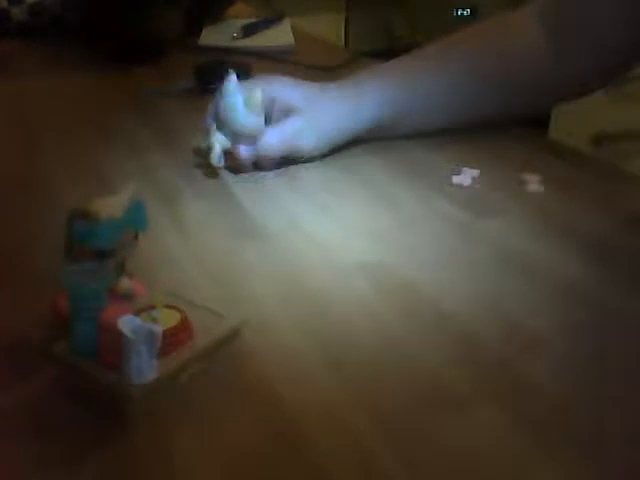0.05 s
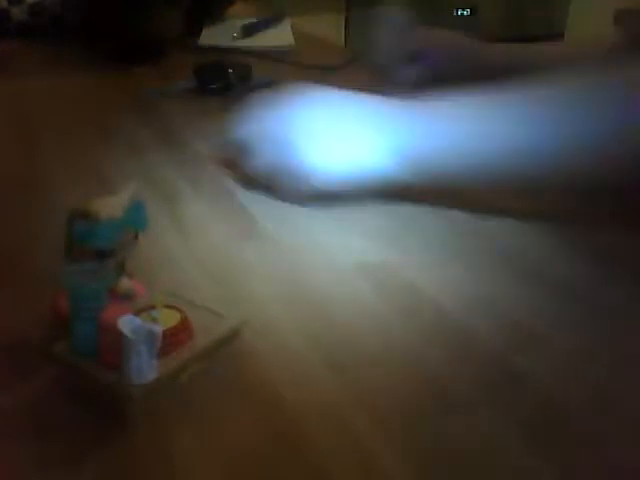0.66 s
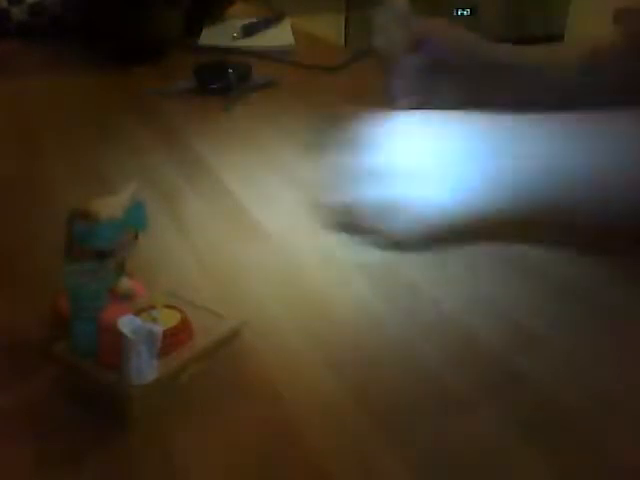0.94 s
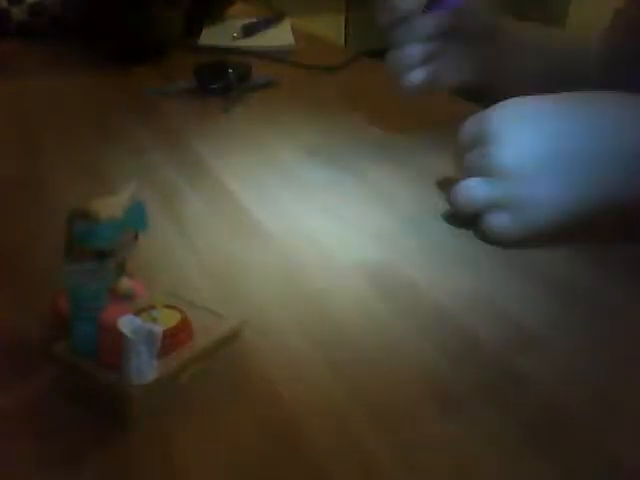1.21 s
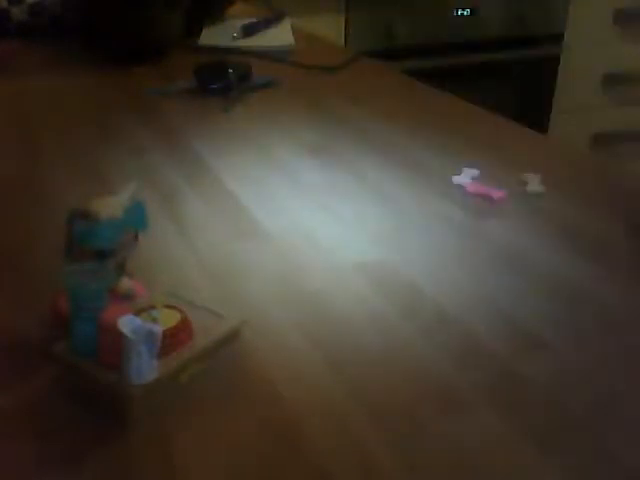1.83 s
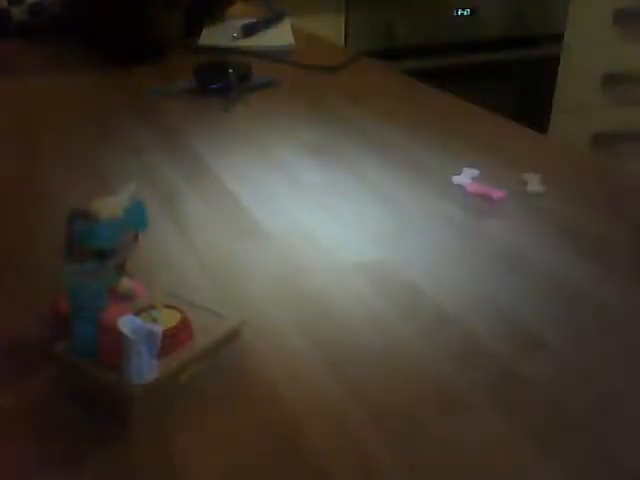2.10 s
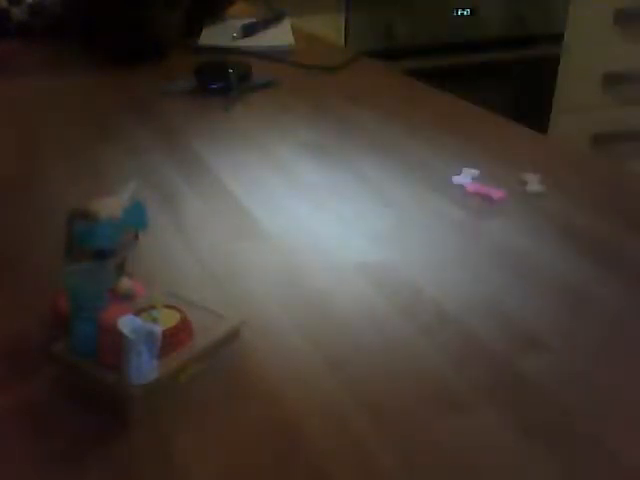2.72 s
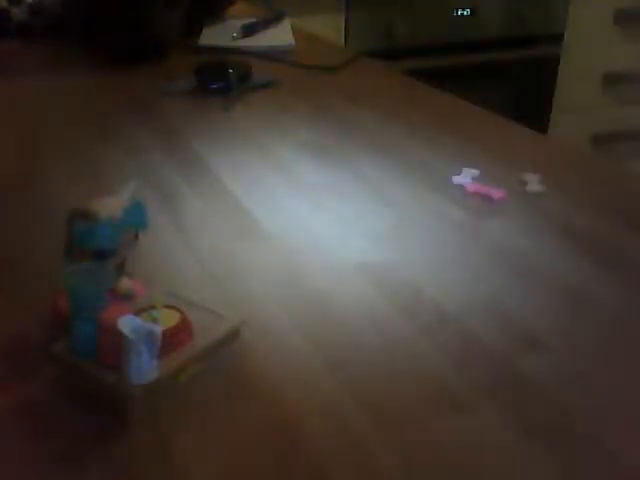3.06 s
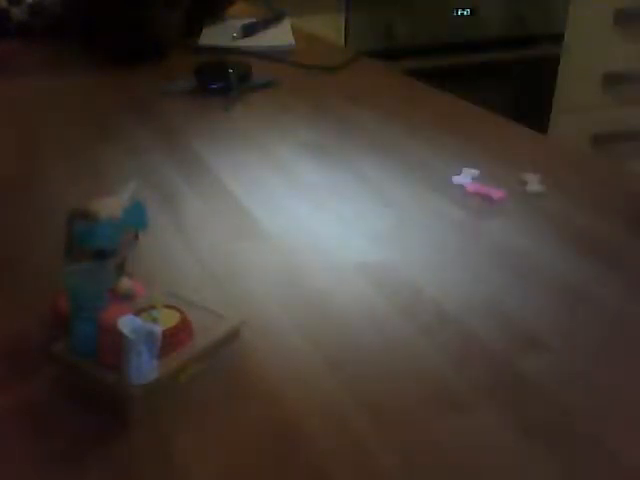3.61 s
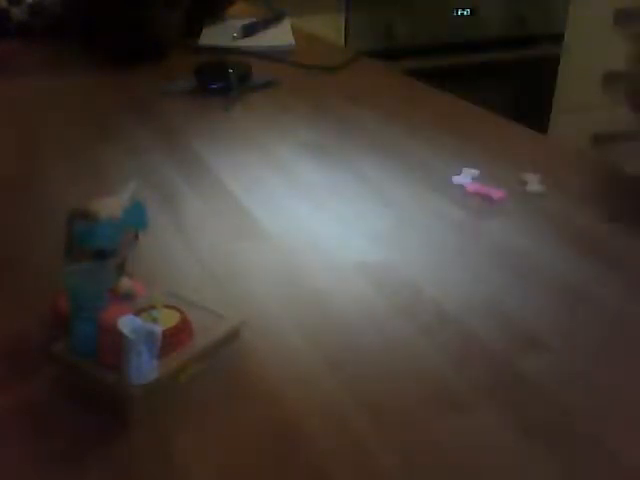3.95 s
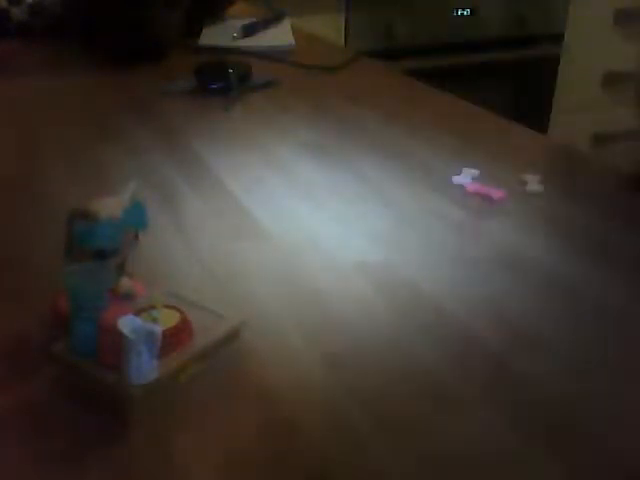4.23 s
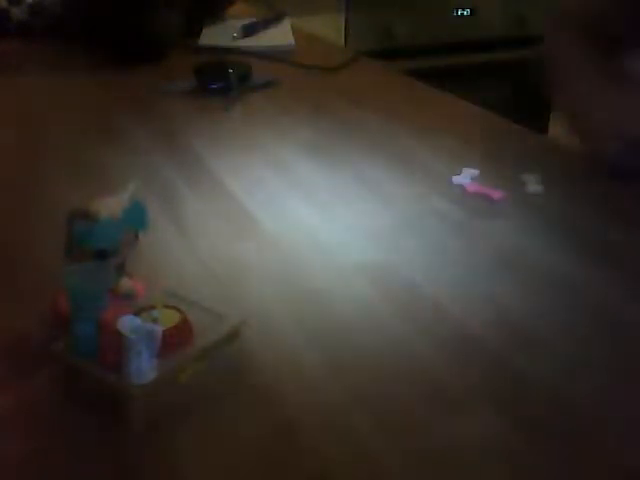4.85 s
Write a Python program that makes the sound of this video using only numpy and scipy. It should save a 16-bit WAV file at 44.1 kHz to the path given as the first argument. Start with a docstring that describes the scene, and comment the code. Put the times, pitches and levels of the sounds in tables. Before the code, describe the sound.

A quiet room with faint hiss and a low fan hum is heard from a microphone standing on a wooden table. Fingers scuff very faintly over plastic at first. Near 0.9 seconds a small hollow toy lands with a light double knock. A short clatter follows around 1.7, then distant taps and soft sleeve rustles until 2.4. After a lull and a faint tap near 3.0, a cluster of knocks comes at 3.2. The loudest knock, sharp and very close, falls at 3.6. More taps and rustling follow from 3.8 to 4.0, and a toy slides over the wood with a dry scrape until about 4.4, ending in a close knock. Leaning arms make a brief low rumble at 4.5. Brighter plastic clacks come at 4.5, 4.7 and 4.9. Distant knocks carry a short room echo, while near ones sound dry.

```python
"""Toy figures on a wooden table

In a quiet room, small plastic figures are put down, knocked and slid, 0.1 to 2.6 m from a microphone
standing on the table. Each blow rings the hollow toy and sends bending waves through the board; far blows
are mostly room, near ones dry and sharp. Sleeves rustle, leaning arms rumble and a cooling fan hums."""
import sys
import numpy as np
from scipy import signal
from scipy.fft import rfft, irfft
from scipy.io import wavfile
from scipy.ndimage import uniform_filter1d

SR = 44100
rng = np.random.default_rng(int(sys.argv[2]) if len(sys.argv) > 2 else 0)


def log_audio(samples):
    """Write samples as a 16-bit WAV file to the path given in sys.argv[1]."""
    # one column per channel
    frames = np.atleast_2d(samples).T
    # limit to full scale, then quantise
    limited = np.clip(frames, -1, 1)
    pcm = np.round(limited * 32767).astype(np.int16)
    wavfile.write(sys.argv[1], SR, pcm)


N = 223587
TIME = np.arange(N) / SR
RING_TIME = np.arange(2 ** 14) / SR  # seconds within one contact's ring


def undb(db):
    """Decibels to gain."""
    return 10 ** (np.asarray(db) / 20)


def unit(x):
    """Scale to rms 1."""
    return x / np.sqrt(np.mean(x ** 2))


def burst(x):
    """Scale a short sound to the energy of 10 ms at rms 1."""
    return x / np.sqrt(np.sum(x ** 2) / (SR / 100))


def fade(t, t60):
    """Exponential decay, 60 dB down at t60."""
    return np.exp(-np.log(1000) * t / t60)


def swell(centre_s, half_s, db):
    """A gain that rises and falls smoothly around one moment."""
    return undb(db) * np.exp(-.5 * ((TIME - centre_s) / half_s) ** 2)


def wander(rate_hz):
    """Smooth random drift; rms 1."""
    hold = max(int(SR / rate_hz), 2)
    steps = np.repeat(rng.standard_normal(N // hold + 1), hold)
    return unit(uniform_filter1d(uniform_filter1d(steps, hold), hold)[:N])


def colour(x, points):
    """Filter a sound through a curve of (Hz, dB) points; rms 1."""
    hz, db = np.transpose(points)
    f = np.maximum(np.fft.rfftfreq(len(x), 1 / SR), 1)
    gain = undb(np.interp(np.log(f), np.log(hz), db))
    return unit(irfft(rfft(x) * gain, len(x)))


def resonate(x, hz, width_hz):
    """A steep-sided resonance; rms 1."""
    b, a = signal.iirpeak(hz, hz / width_hz, SR)
    return unit(signal.lfilter(b, a, signal.lfilter(b, a, x)))


def friction(grain_db):
    """Countless tiny slips of uneven size."""
    return rng.standard_normal(N) * undb(grain_db * np.minimum(rng.exponential(size=N), 6))


# noise floor at the microphone: (frequency [Hz], relative density [dB])
AIR_COLOUR = [(12, -24), (22, -0.5), (48, -1.5), (80, -13.5), (110, -7), (170, -3.5), (250, -11.5),
              (430, -15), (900, -21.5), (1900, -24.5), (3000, -25), (6500, -25.5), (12000, -30)]
def air():
    """Still air and microphone hiss, strongest in the bass."""
    return undb(-63) * colour(rng.standard_normal(N), AIR_COLOUR)


# a small fan in the background, speeding up a little: (time [s], shaft rate [Hz], whine [Hz])
FAN_SPEED = [(0, 74.93, 6520), (.8, 75.9, 6530), (1.4, 77.33, 6900), (2.2, 79.9, 6960), (5.07, 81.03, 6800)]
# its hum at the microphone: (multiple of the shaft rate, level [dB])
FAN_ORDERS = [(1, -69.5), (2, -74), (3, -73.5)]
def fan(pulse_hz=7.6):
    """The turning shaft hums in wavering harmonics under a thin, pulsing whine."""
    times, shaft_hz, whine_hz = np.transpose(FAN_SPEED)
    shaft_phase = 2 * np.pi * np.cumsum(np.interp(TIME, times, shaft_hz)) / SR
    whine_phase = 2 * np.pi * np.cumsum(np.interp(TIME, times, whine_hz)) / SR
    hum = np.zeros(N)
    for order, db in FAN_ORDERS:
        tone = np.sin(order * shaft_phase + .4 * wander(8))
        waver = undb(2.2 * np.sqrt(order) * wander(5))
        hum += undb(db) * unit(tone * waver)
    pulsing = np.clip(.5 + 2 * np.sin(2 * np.pi * pulse_hz * TIME), 0, 1)
    whine = np.sin(whine_phase + .9 * wander(140)) * pulsing
    return hum + undb(-85) * unit(whine)


# swells in the background hum: (centre [s], half length [s], level [dB], frequency [Hz])
HUM_SWELLS = [(0.863, .35, -63.5, 150.5), (2.8, 0.11, -69, 248)]
def hum_swells():
    """Narrow bands of low noise waver, rise and sink away."""
    return sum(resonate(rng.standard_normal(N), hz, width_hz=16) * swell(centre_s, half_s, db)
               for centre_s, half_s, db, hz in HUM_SWELLS)


# the room around the table: (band [Hz], t60 [s], level [dB])
ROOM_BANDS = [(92, 0.91, -11), (218, 0.38, 9), (500, 0.68, 2), (930, 0.58, -1), (1540, 0.52, 3),
              (3150, 0.65, -4.5), (6500, 0.58, -0.5), (12000, 0.23, 4)]
def room(x, gap_s, build_s):
    """Wall reflections thicken into a diffuse tail whose top treble dies first."""
    hz, t60s, levels = np.transpose(ROOM_BANDS)
    t = np.arange(SR) / SR
    log_f = np.log(np.maximum(np.fft.rfftfreq(SR, 1 / SR), 1))
    noise = rfft(rng.standard_normal(SR))
    tail = np.zeros(SR)
    for selector, t60, db in zip(np.eye(len(hz)), t60s, levels):
        band = irfft(noise * np.interp(log_f, np.log(hz), selector), SR)
        tail += band * undb(db) * fade(t, t60)
    tail *= np.clip((t - gap_s) / build_s, 0, 1)
    return signal.fftconvolve(x, tail / np.sqrt(SR * 0.025))[:N]


# arms leaning on the table: (centre [s], half length [s], level [dB])
LEANS = [(3.98, 0.11, -47), (4.5, 0.036, -36), (4.85, 0.5, -56.5)]
# their rumble under the microphone: (frequency [Hz], relative density [dB])
RUMBLE_COLOUR = [(12, -12), (22, -3.5), (31, -8.5), (45, -7), (75, -13.5), (110, -8), (200, -51),
                 (400, -50.5)]
def rumble():
    """The table shifts under leaning arms."""
    return colour(rng.standard_normal(N), RUMBLE_COLOUR) * sum(swell(*row) for row in LEANS)


# fingers turning a figure at the far side of the table: (frequency [Hz], relative density [dB])
HANDLING_COLOUR = [(900, -9.5), (1800, -0.5), (2500, -11), (3150, 2), (3500, -9), (4200, -5), (6000, -26)]
def handling(let_go_s=0.59):
    """Skin scuffs faintly over plastic, then lets go."""
    release = fade(np.maximum(TIME - let_go_s, 0), t60=0.44)
    scuff = colour(friction(grain_db=3), HANDLING_COLOUR)
    return scuff * undb(-74.5 + 0.78 * wander(32)) * release


# sleeves and fingers on the tabletop: (centre [s], half length [s], level [dB])
RUSTLES = [(1.106, 0.031, -67), (1.718, 0.033, -65), (2.076, 0.026, -61), (2.231, 0.068, -67),
           (2.365, 0.042, -59.5), (3.57, 0.045, -58.5), (3.81, 0.056, -59.5), (3.905, 0.011, -49.5)]
# their tone at the microphone: (frequency [Hz], relative density [dB])
RUSTLE_COLOUR = [(800, -3), (2000, 1.5), (3500, -0.5), (5500, 6), (7500, 1.5), (10000, -4), (12000, -5)]
def rustle():
    """Cloth and skin brush the wood in short, fluttering swells."""
    flutter = undb(1.5 * wander(80))
    brushing = colour(friction(grain_db=2.5), RUSTLE_COLOUR)
    return brushing * sum(swell(*row) for row in RUSTLES) * flutter


# dry scrape of a toy pushed along the tabletop: (frequency [Hz], relative density [dB])
SCRAPE_COLOUR = [(100, -6), (270, -4.5), (420, -6), (680, 2), (1000, -12), (1550, -2), (2000, -7),
                 (2500, 0), (2950, -6.5), (3800, -2), (6200, 2), (7300, 0), (8600, -3.5), (12000, -7.5)]
# resonances of the sliding toy: (frequency [Hz], width [Hz], relative level [dB])
SLIDE_MODES = [(2300, 260, -12), (4630, 240, 2), (5520, 380, 0), (6670, 240, -5), (7960, 250, -11)]
def slide(start_s=3.95, end_s=4.47, drag_db=-55, lag_s_per_octave=0.074):
    """Plastic skids over the grain; the slips ring the toy, its higher modes later as it gathers speed."""
    slips = friction(grain_db=3)
    strongest_hz = SLIDE_MODES[1][0]
    singing = np.zeros(N)
    for hz, width_hz, db in SLIDE_MODES:
        centre_s = 4.14 + lag_s_per_octave * np.log2(hz / strongest_hz)
        singing += resonate(slips, hz, width_hz) * swell(centre_s, half_s=.085, db=db - 49)
    scrape = colour(friction(grain_db=2.5), SCRAPE_COLOUR)
    grip = undb(1.1 * wander(80))
    touching = (TIME > start_s) & (TIME < end_s)
    push = np.hypot(swell(centre_s=4.195, half_s=.092, db=-42.5), undb(drag_db))
    return (scrape * push + singing) * grip * touching


def ring(modes, spot_hz, wash_db, wash_t60, tilt_db=0):
    """A struck body rings in a few main modes over a wash of crowded ones; returns (near, radiated)."""
    hz, db, t60 = np.transpose(modes)
    db = db + tilt_db * np.log2(hz / hz.mean())
    outline = [(hz[0] / 2, db[0] - 17.5), *zip(hz, db), (hz[-1] * 2, db[-1] - 57)]
    # the crowded modes start in step, as a crack, then drift apart
    crack = 1 + 2.5 * fade(RING_TIME, wash_t60 / 6)
    crowd = colour(rng.standard_normal(len(RING_TIME)), outline)
    wash = burst(crowd * fade(RING_TIME, wash_t60) * crack)
    # the mode with an antinode under the contact point is lifted most
    favoured_db = 10 * np.exp(-(np.log2(hz / spot_hz) / 0.17) ** 2)
    # every blow is held a little differently
    scatter_db = 1.5 * rng.standard_normal(len(hz))
    detune = .01 * rng.standard_normal(len(hz))
    swings = np.sin(2 * np.pi * np.outer(hz * (1 + detune), RING_TIME)) * fade(RING_TIME, t60[:, None])
    polarity = (-1) ** np.arange(len(hz))
    main = burst((undb(db + favoured_db + scatter_db) * polarity) @ swings)
    # the sum over all directions is a short click with the body's broad colour
    impulse = signal.unit_impulse(len(RING_TIME), SR // 500)
    click = burst(colour(impulse, outline))
    return np.array([burst(main + undb(wash_db) * wash), burst(click + undb(-6) * main)])


def bend(x, lag_s):
    """Bending waves speed up with the root of frequency, so lows arrive late (lag_s at 1 kHz)."""
    f = np.fft.rfftfreq(len(RING_TIME), 1 / SR)
    phase = 4 * np.pi * lag_s * np.sqrt(1000 * f)
    return irfft(rfft(x) * np.exp(-1j * phase))


# the whole table flexing on its legs: (frequency [Hz], relative level [dB], t60 [s])
TABLE_MODES = [(41.7, -9, 0.061), (73.6, -3.5, 0.4), (107, -7.5, 0.75), (141, -13, 0.17), (175, -8.5, 0.37),
               (221, -15, 0.23), (305, -10.5, 0.18), (415, -17, 0.37)]
# the wooden top under the microphone: (frequency [Hz], relative level [dB], t60 [s])
TOP_MODES = [(438, -9, 0.019), (538, -6, 0.084), (636, -7.5, 0.073), (715, 0, 0.061), (856, 0.5, 0.056),
             (992, -9, 0.067), (1140, -7, 0.059), (1330, -3, 0.011), (1537, -9.5, 0.024),
             (1836, -14, 0.018), (2440, -22.5, 0.013), (2724, -18.5, 0.021)]
# the hollow plastic figure: (frequency [Hz], relative level [dB], t60 [s])
SHELL_MODES = [(1660, 2.5, 0.025), (1985, -4.5, 0.048), (2366, 2, 0.042), (2870, 2, 0.03),
               (3257, -1, 0.0087), (3413, -2.5, 0.05), (3795, 0.5, 0.032), (4230, -7.5, 0.08),
               (4730, -5, 0.05)]
# its hard feet meeting the wood: (frequency [Hz], relative level [dB], t60 [s])
FEET_MODES = [(4970, 1.5, 0.027), (5570, 1, 0.03), (5974, 0.5, 0.028), (6610, 2, 0.021),
              (7450, -4.5, 0.021), (7760, -18, 0.08), (8380, -4, 0.012), (10340, -10, 0.027),
              (11700, -12, 0.034)]
def strike(toy_db, thump_db, distance_m, spot_hz):
    """One contact rings table, top, shell and feet; returns (near, radiated)."""
    # contacts that favour high modes brighten the knock, low ones dull it (dB per octave)
    tilt_db = 9.5 * np.tanh(np.log2(spot_hz / 790) / 0.9)
    # the tick grows with the toy's share and loses 3 dB more per doubling of distance
    tick_db = toy_db - 6.5 - 3 * np.log2(distance_m)
    # a toy that lands squarely, no louder than the wood, favours the modes of its wall
    shell_spot_hz = spot_hz if toy_db > 0 else 2600
    thump = ring(TABLE_MODES, spot_hz, wash_db=-5, wash_t60=.36)
    knock = ring(TOP_MODES, spot_hz, wash_db=-1.5, wash_t60=.079, tilt_db=tilt_db)
    shell = ring(SHELL_MODES, shell_spot_hz, wash_db=-2, wash_t60=.03)
    tick = ring(FEET_MODES, spot_hz, wash_db=-2, wash_t60=.025)
    wood = bend(undb(thump_db) * thump, lag_s=0.002388) + bend(knock, lag_s=0.000996)
    return wood + undb(toy_db) * shell + undb(tick_db) * tick


# toys landing on the table: (time [s], knock level at 1 m [dB], toy over knock [dB],
# thump over knock [dB], distance to the microphone [m], favoured mode [Hz], force kept per bounce [0-1])
BLOWS = [ (0.9398, -41.5, -13, -2.5, 1.5, 715, 0.13), (0.9545, -44.5, 2.5, -11, 1.65, 2900, 0),
         (1.647, -54.5, 13, 2.5, 0.94, 2960, 0.08), (1.676, -58, 6.5, -21, .9, 3360, 0.1),
         (1.7023, -36.5, -13.5, -0.5, 1.08, 538, 0.34), (1.732, -45, -32, -33, 0.47, 438, 0.1),
         (1.797, -49, -6, 2, 2.1, 992, 0), (1.897, -47.5, -27, 2.5, 2.3, 305, 0),
         (1.9582, -55, -8, -14, 1.64, 1836, 0.05), (2.959, -52.5, -4.5, -2.5, 2.6, 636, 0.16),
         (3.172, -33, -12.5, -9, 1.27, 992, 0.08), (3.195, -37.5, -4, -10.5, 1.06, 1330, 0.34),
         (3.255, -47.5, -10.5, -8.5, 0.69, 992, 0.1), (3.3395, -49.5, -17, -13.5, 1.02, 992, 0.1),
         (3.456, -72.5, -5, 14.5, 0.41, 107, 0), (3.5744, -37, -6, -13, 0.19, 765, 0),
         (3.7763, -42.5, -4.5, -8, 1.5, 1000, 0.4), (3.924, -47.5, -8.5, -20.5, 0.098, 2440, 0.02),
         (3.9447, -47.5, -7.5, -9.5, 0.21, 992, 0.04), (3.978, -46, -20, -19, 0.96, 856, 0.44),
         (4.077, -62.5, 5, 2, 0.23, 4230, 0.17), (4.428, -47.5, -5.5, -4, 0.11, 1160, 0.02),
         (4.4413, -60.5, 6, 5, 0.24, 4730, 0.68), (4.486, -45, 4.5, 0, 0.8, 107, 0.4),
         (4.671, -52.5, 12, -9, 0.66, 3795, 0.34), (4.674, -40.5, 5.5, -8, .9, 1660, 0),
         (4.9233, -44, 4.5, -6, 0.83, 775, 0.13)]
def blows(contacts=3, first_flight_s=.0125, flight_ratio=.75):
    """Toys rebound ever sooner and weaker; direct sound falls with distance, the room's share does not."""
    direct, to_room = np.zeros((2, N + len(RING_TIME)))
    for time_s, db, toy_db, thump_db, distance_m, spot_hz, bounce in BLOWS:
        near, radiated = strike(toy_db, thump_db, distance_m, spot_hz)
        for k in range(contacts):
            start = int(time_s * SR)
            span = slice(start, start + len(RING_TIME))
            force = undb(db) * bounce ** k
            direct[span] += force * near / distance_m
            to_room[span] += force * radiated
            time_s += first_flight_s * flight_ratio ** k
    return direct[:N], to_room[:N]


def scene():
    """Toys, table and room at one microphone standing on the tabletop."""
    direct, radiated = blows()
    rubbing = slide() + rustle() + handling()
    reflections = room(undb(-6.5) * (radiated + rubbing), gap_s=0.00069, build_s=0.0024)
    return (direct + rubbing + reflections + rumble() + fan() + air() + hum_swells())[None]


def record(dry):
    """The recorder cuts the treble steeply above 12150 Hz."""
    return signal.sosfilt(signal.ellip(10, .2, 70, 12150, fs=SR, output="sos"), dry)


dry = scene()
out = record(dry)
log_audio(out)
```